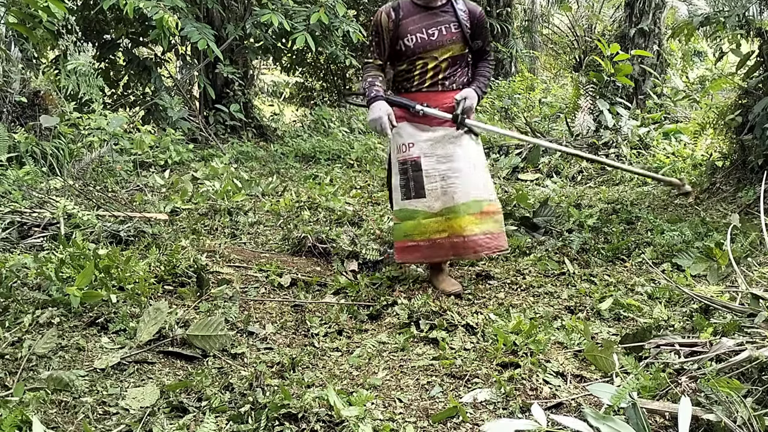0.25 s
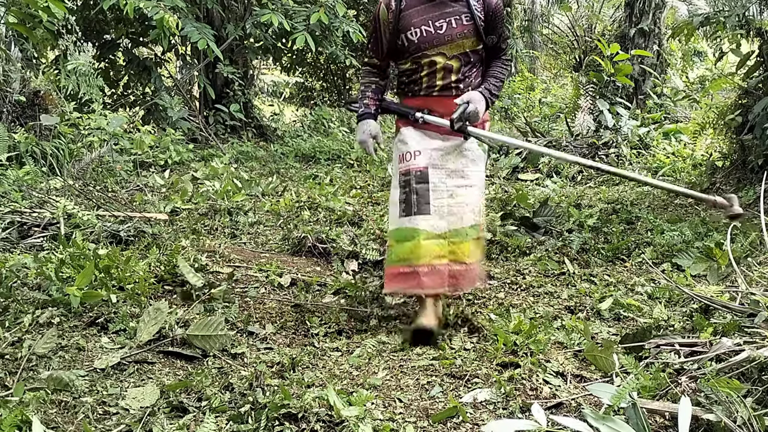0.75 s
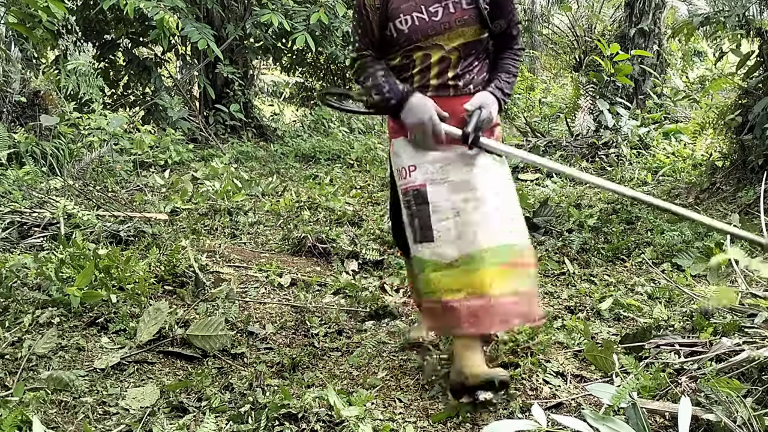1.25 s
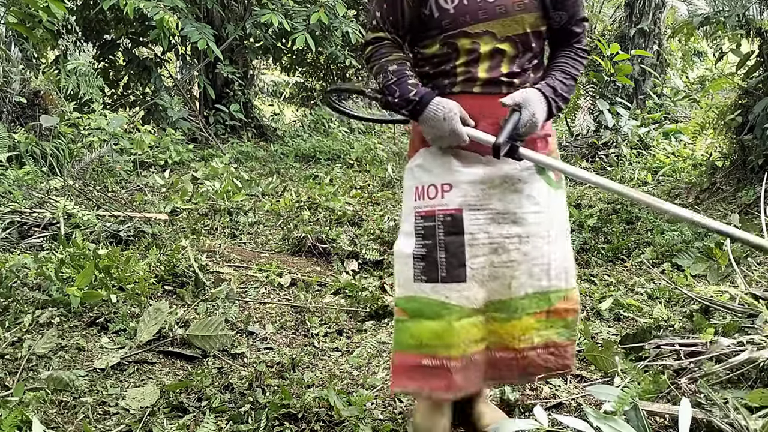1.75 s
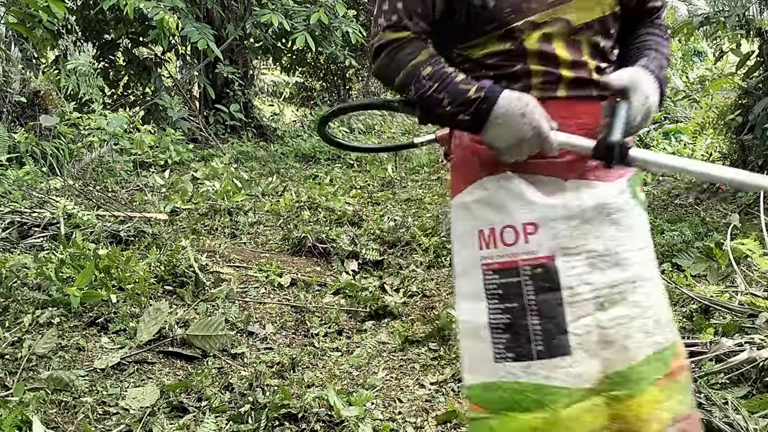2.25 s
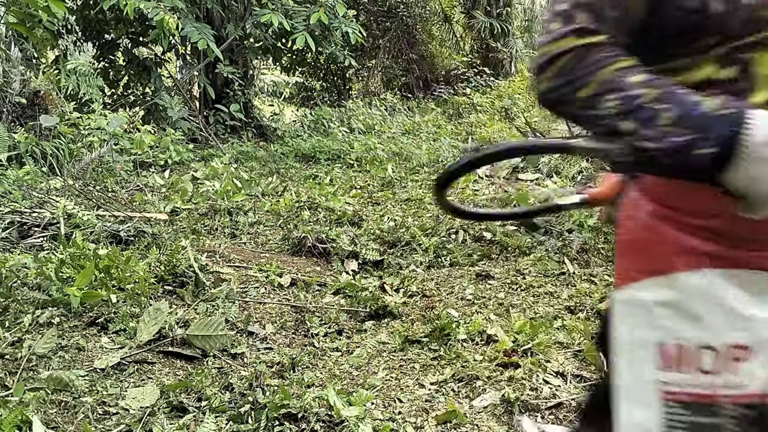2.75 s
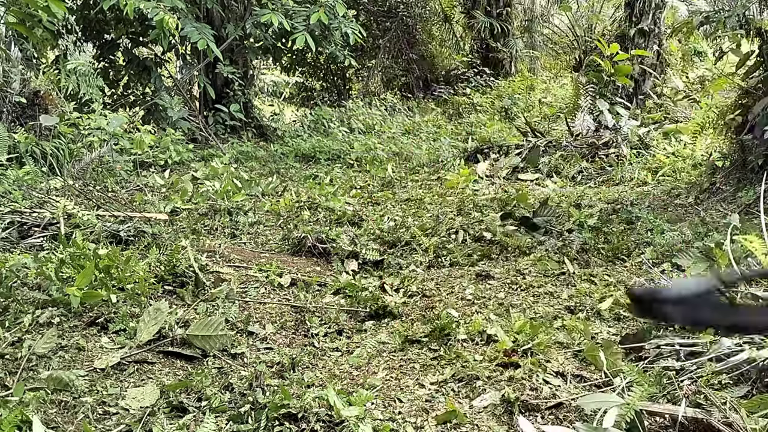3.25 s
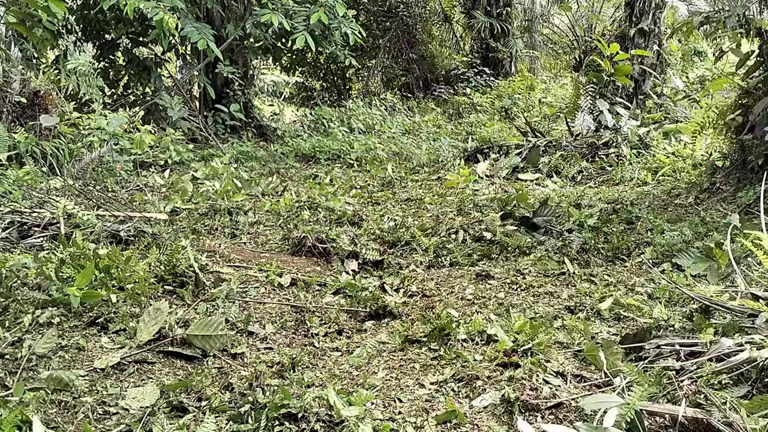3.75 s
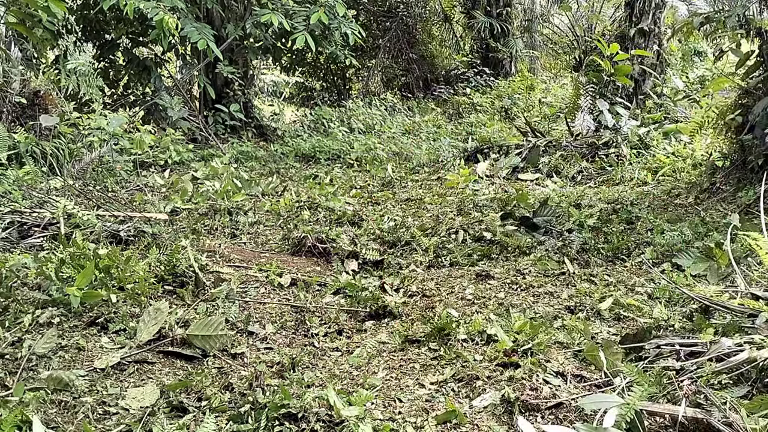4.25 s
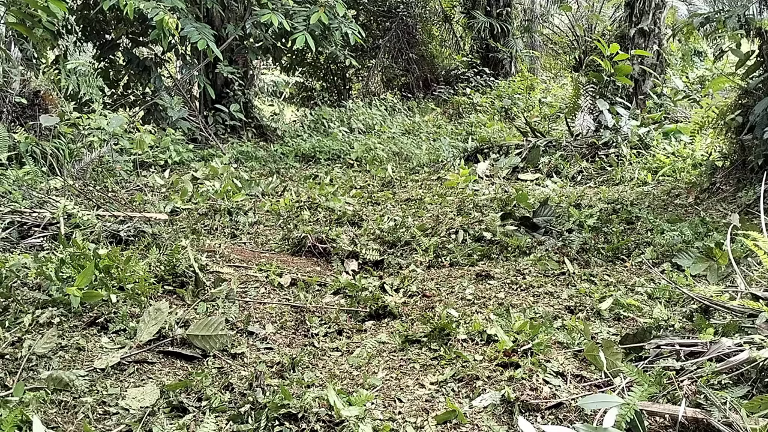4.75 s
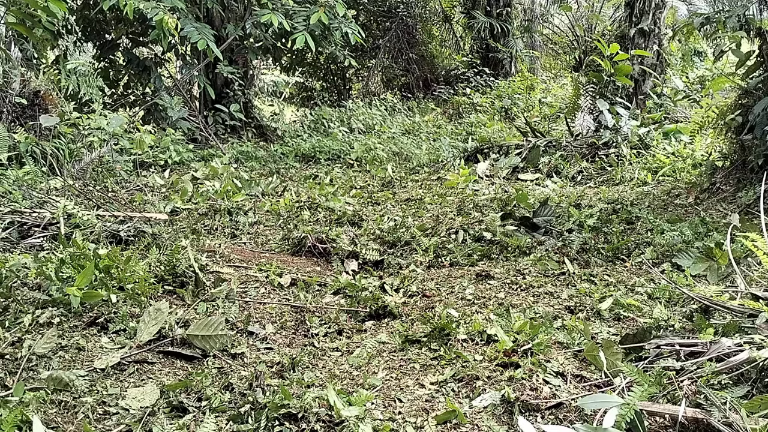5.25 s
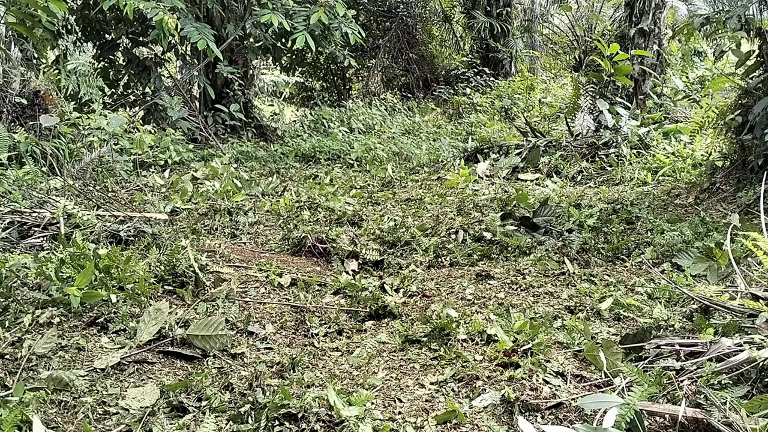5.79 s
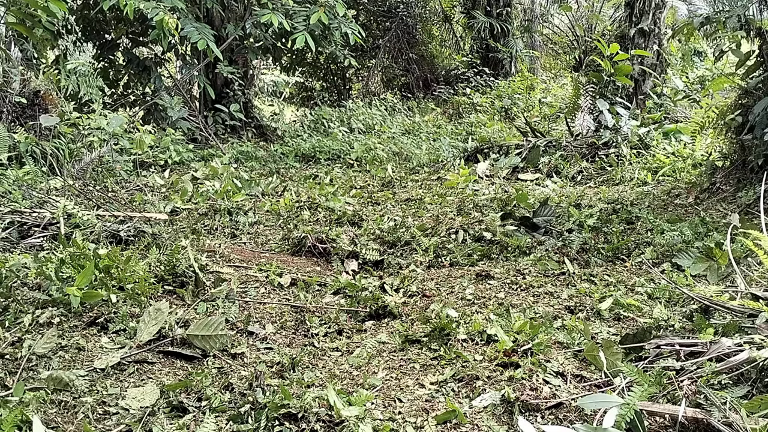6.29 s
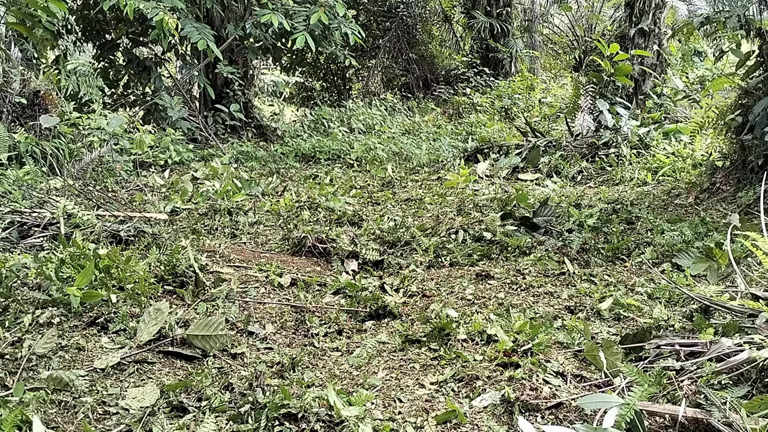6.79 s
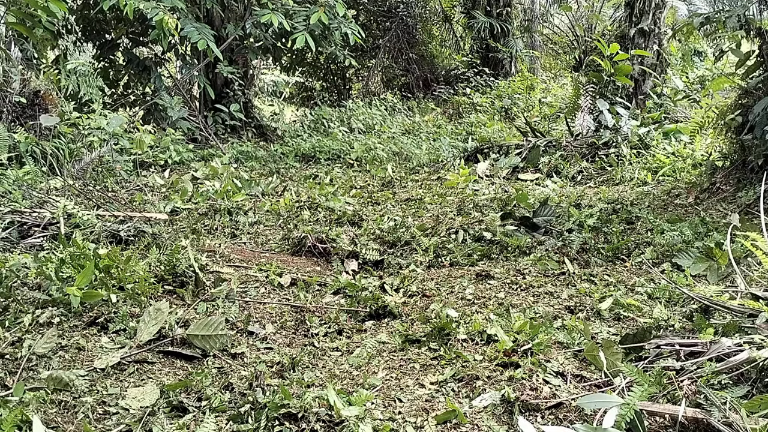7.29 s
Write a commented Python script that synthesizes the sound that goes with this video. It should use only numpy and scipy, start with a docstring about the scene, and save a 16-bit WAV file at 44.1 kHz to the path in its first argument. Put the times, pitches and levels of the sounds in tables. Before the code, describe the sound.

A two-stroke brush cutter idles throughout, carried on a walker's back in an open plantation. From 0 to 1 s it is fairly quiet and muffled: rapid soft puffs, roughly twenty-five a second, with uneven stronger pops every 0.05 to 0.15 s. It gradually nears from 1 to 3 s; a boot crunches dry leaves around 1.45 s, with twig snaps from 1.2 to 1.7 s. As the worker passes, about 3 to 3.5 s, the exhaust swings toward the microphone and the pops become much louder, hollow and crackling, with brief gas hiss, ticks, loose rattles and fine metallic jingle. It peaks around 4 to 5 s, more twigs snapping near 4.4 to 4.6 s. It softens a little around 5.4 to 6.3 s, then strengthens again until the cut-off at 7.5 s, still idling. Faint low rumble lies beneath; close, dry, almost mono sound with a short ground reflection.

```python
"""A two-stroke brush cutter idles on a worker's back as he walks up to the listener and past, in a plantation.
Fired turns pop, with a crack and gas hiss; unfired turns breathe a dull puff. Both ring silencer modes.
Ticks, running noise and a treble jingle come from decaying sines and filtered noise.
A delayed, dulled copy is the ground echo; boots stir dry leaves, twigs snap, a low rumble lies beneath."""
import sys
import numpy as np
from scipy import signal
from scipy.fft import rfft, irfft, next_fast_len
from scipy.io import wavfile
from scipy.ndimage import uniform_filter1d

SR = 44100
rng = np.random.default_rng(int(sys.argv[2]) if len(sys.argv) > 2 else 0)


def unload_wav(signal):
    """Save mono or channel-first audio to the path in sys.argv[1] as 16-bit WAV at rate SR, clipped to [-1, 1]."""
    wavfile.write(
        sys.argv[1],
        SR,
        np.round(np.clip(np.atleast_2d(signal).T, -1, 1) * 32767).astype(np.int16),
    )


N = 332073

# fired turns: t/s, relative pop level/dB, relative crack level/dB
FIRED_TURNS = [(0.0698, -25.5, -44.5), (0.1402, -23.5, -42.5), (0.207, -27, -53), (0.262, -22.5, -37),
               (0.355, -21.5, -35), (0.4444, -24.5, -49), (0.5756, -24, -38), (0.645, -22.5, -42),
               (0.707, -23, -43), (0.775, -24, -46), (0.845, -24, -39), (0.9092, -23.5, -38),
               (1.041, -23.5, -41), (1.1, -22.5, -40), (1.2699, -21, -48), (1.3451, -20.5, -42),
               (1.4083, -17.5, -31.5), (1.511, -19.5, -45), (1.5823, -19, -46), (1.6465, -17.5, -32.5),
               (1.742, -16.5, -35.5), (1.836, -17.5, -47), (1.955, -16, -33), (2.051, -16.5, -36),
               (2.119, -18.5, -57), (2.188, -14.5, -32), (2.262, -14, -34.5), (2.3624, -15.5, -35),
               (2.42, -18, -55), (2.493, -13.5, -29.5), (2.593, -19, -54.5), (2.628, -16, -41),
               (2.6991, -12.5, -29), (2.79, -15.5, -38), (2.8559, -12.5, -32), (2.9144, -13, -39),
               (2.9784, -13.5, -38), (3.0411, -12, -29), (3.1374, -9.5, -28), (3.215, -11, -38),
               (3.2868, -12.5, -39), (3.349, -7, -21.5), (3.4457, -7.5, -27), (3.5399, -7.5, -22.5),
               (3.6248, -11, -44), (3.6944, -10.5, -40), (3.7694, -8, -28.5), (3.834, -11.5, -52),
               (3.898, -6.5, -26.5), (3.9933, -10, -37), (4.0552, -6, -22.5), (4.122, -12.5, -37),
               (4.1575, -5.5, -23.5), (4.313, -4.5, -21), (4.413, -10, -34), (4.473, -8, -33),
               (4.549, -6.5, -24.5), (4.6021, -5.5, -24), (4.705, -6.5, -26.5), (4.7872, -13.5, -52),
               (4.8243, -11, -34), (4.9003, -8, -23.5), (4.9709, -7.5, -26), (5.0652, -6.5, -23.5),
               (5.1864, -11.5, -48), (5.2227, -9.5, -37), (5.2979, -6.5, -25.5), (5.381, -14.5, -33),
               (5.451, -9, -26), (5.549, -13, -56), (5.5794, -13, -55), (5.647, -8.5, -25),
               (5.747, -9, -26.5), (5.837, -12.5, -40.5), (5.899, -10.5, -33), (5.9974, -9.5, -33),
               (6.1294, -11, -36), (6.1845, -10, -34.5), (6.2583, -10, -40), (6.324, -9, -28.5),
               (6.454, -9, -31), (6.528, -9, -34), (6.6009, -11, -61), (6.6673, -7.5, -28.5),
               (6.7676, -6.5, -21.5), (6.858, -12.5, -46.5), (6.8937, -8, -37), (6.9528, -9, -39),
               (7.017, -6.5, -24), (7.113, -8.5, -29.5), (7.2043, -11.5, -42), (7.272, -6.5, -24.5),
               (7.3456, -9, -42), (7.4117, -5.5, -21), (7.513, -8.5, -34)]
# unfired puffs, also the nearness of the engine: t/s, relative level/dB
PUFF_LEVEL = [(0.0, -19), (0.5, -20), (1.0, -18.5), (1.5, -17.5), (2.0, -16.5), (2.5, -16.5), (3.0, -14.5),
              (3.5, -12.5), (4.0, -9.5), (4.5, -7.5), (5.0, -10.5), (5.5, -13.5), (6.0, -15), (6.5, -13),
              (7.0, -10.5), (7.5, -11)]
# walk past: t/s, exhaust facing the listener/0-1, engine side-on/0-1, extra path via the ground/ms
WALK_PAST = [(0, 0.03, 0.01, 0.48), (1, 0.02, 0.14, 0.45), (1.5, 0.01, 0.54, 0.58), (2.5, 0, 0.98, 0.77),
             (3, 0.21, 1, 0.95), (3.5, 0.72, 0.93, 1.21), (4, 0.84, 0, 1.35), (4.8, 0.85, 0.08, 1.37),
             (5.5, 0.69, 0.97, 1.17), (6, 0.35, 1, 0.91), (6.5, 0.71, 0.84, 1.06), (7, 0.73, 0.5, 1.36),
             (7.53, 0.84, 0.63, 1.29)]
POP_AWAY_DB = 5.5  # a pop is this much softer with the exhaust turned away


def charges_db():
    """Charge: pop level over puff level, corrected for exhaust aim."""
    fire_s, pop_db, _ = np.transpose(FIRED_TURNS)
    return pop_db - puff_level_db(fire_s) + POP_AWAY_DB * (1 - exhaust_facing(fire_s))


def puff_level_db(s):
    """Puff level at given times; it follows the walk."""
    return np.interp(s, *np.transpose(PUFF_LEVEL))


def exhaust_facing(s):
    """Share of the exhaust that points at the listener, 0-1."""
    return np.interp(s, *np.transpose(WALK_PAST)[:2])


# half burns, dull puffs that come early and reset the beat: t/s
HALF_BURN_S = [0.006, 0.4207, 0.506, 0.978, 1.006, 1.1673, 1.234, 1.923, 2.757, 3.1574, 3.8601, 4.0191,
               4.2441, 4.435, 4.573, 4.7564, 5.1498, 5.511, 5.804, 6.095, 6.155, 6.4141, 7.1681, 7.479]
# idle speed: t/s, length of a turn before slowing and kick/ms
IDLE_TURN = [(0, 35.5), (0.8, 38), (1.2, 36), (1.8, 33.5), (2.5, 39), (3, 37.5), (4, 36), (5.4, 37.5),
             (6.1, 40), (6.7, 37.5), (7.53, 37.5)]
KICK_MS_PER_DB = 0.67  # a bigger charge shortens the next turns
SLOWING = 1.035  # length ratio of successive coasting turns
SHORTEST_S = .016  # least gap before the next burn


def coasting():
    """Times of unfired turns: after each burn the crank coasts on, ever slower."""
    fire_s = np.transpose(FIRED_TURNS)[0]
    burn_s = np.r_[fire_s, HALF_BURN_S]
    charge_db = np.r_[charges_db(), np.zeros(len(HALF_BURN_S))]
    turn_ms = np.interp(burn_s, *np.transpose(IDLE_TURN)) - KICK_MS_PER_DB * charge_db
    coast = np.cumsum(SLOWING ** np.arange(4))
    turn_s = burn_s[:, None] + turn_ms[:, None] / 1000 * coast
    ahead_s = np.r_[np.sort(burn_s), N / SR]
    next_burn_s = ahead_s[np.searchsorted(ahead_s, burn_s, "right")]
    free = turn_s < next_burn_s[:, None] - SHORTEST_S
    return np.sort(np.r_[HALF_BURN_S, turn_s[free]])


# a bigger charge rises more slowly and rings the upper modes harder
SLOWER_PER_DB, BRIGHTER_DB_PER_DB, BRIGHT_FROM_HZ = 0.0139, 0.4, 560


def silencer(s, db, modes, heat, scatter_db, charge_db, choke_ms, left_ringing):
    """Each blow-down rings decaying modes, choked to a share as the port shuts."""
    walked_s, _, side_on, _ = np.transpose(WALK_PAST)
    facing, side_on = exhaust_facing(s), np.interp(s, walked_s, side_on)
    since = np.arange(2200) / SR
    shut = left_ringing + (1 - left_ringing) / (1 + np.exp(1000 * since - choke_ms))
    chance = rng.standard_normal((len(s), len(modes)))
    out = 0
    for mode, c in zip(modes, chance.T):
        hz, t60, rise_ms, after_ms, away_db, side_db, facing_db, share = mode
        t = np.maximum(since - after_ms / 1000, 0)
        not_facing = side_on * undb(side_db) + (1 - side_on) * undb(away_db)
        aim = facing * undb(facing_db) + (1 - facing) * not_facing
        octaves_up = np.log2(max(hz / BRIGHT_FROM_HZ, 1))
        size = aim * undb(db + scatter_db * c + BRIGHTER_DB_PER_DB * charge_db * octaves_up)
        rise_ms = rise_ms * np.exp(SLOWER_PER_DB * charge_db)[:, None]
        ring = np.sin(2 * np.pi * hz * (1 + share * heat[:, None]) * t)
        out = out + size[:, None] * ring * (1 - np.exp(-1000 * t / rise_ms)) * undb(-60 * t / t60)
    return place(s, out * shut)


# silencer modes, fired: f/Hz before heat, t60/s, rise before charge/ms, delay/ms,
# gain from behind/dB, gain side-on/dB, gain facing the exhaust/dB, share of pitch that follows heat
FIRED_MODES = [(162.3, 0.24, 7, 5.995, 13.5, 6.5, -1, 0.28), (79, 0.0098, 1.57, 8.32, 20, 18.5, -4, 0.05),
               (232.6, 0.2, 0.06, 2.07, 2, -7.5, -1, 0.4), (313.8, 0.038, 8.4, 0.38, -3, -22, 11.5, 0.24),
               (448, 0.033, 0.52, 3.42, -19, 2, -5.5, 0.026),
               (113.7, 0.14, 0.15, 7.44, -3.5, -6.5, -5.5, 0.067),
               (513, 0.017, 1.5, 2.61, -9.5, -2.5, -2, 0.065),
               (662.5, 0.014, 1.3, 2.646, 0.5, -4, -5, 0.046),
               (991, 0.025, 2.4, 2.24, -25, -15.5, -16, 0.1)]


def pops():
    """Fired blow-downs; a bigger charge leaves hotter gas, which rings higher."""
    fire_s, pop_db, _ = np.transpose(FIRED_TURNS)
    heat = 0.022 * (pop_db - puff_level_db(fire_s))
    return silencer(fire_s - .002, pop_db, FIRED_MODES, heat, 0.81, charges_db() - 2.5,
                    choke_ms=17.3, left_ringing=0.15)


# silencer modes, unfired: f/Hz before heat, t60/s, rise/ms, delay/ms,
# gain from behind/dB, gain side-on/dB, gain facing the exhaust/dB, share of pitch that follows heat
UNFIRED_MODES = [(131.4, 0.046, 8.9, 1.38, 17.5, 18, 15.5, 0.93),
                 (189.2, 0.093, 0.26, 5.28, -29, -11, 1.5, 1.2),
                 (164.3, 0.095, 7.6, 0.87, -5, -28, 7.5, 1.0), (427, 0.054, 8.3, 1.4, -19.5, 1, -12, 0.23),
                 (686, 0.052, 2.5, 2.51, -25, -16, -24.5, 1.9),
                 (114.7, 0.2, 3.15, 4.22, -0.5, 0, -7.5, 0.28)]
SUCK_MS, SUCK_DB = 3.1, -10  # level relative to the puff


def puffs(cold_s):
    """Unfired cylinders suck for a moment, then puff through the silencer."""
    chance = rng.standard_normal((len(cold_s), 2)).T
    level_db = puff_level_db(cold_s)
    puff = silencer(cold_s - .0012, level_db + .5 * chance[0], UNFIRED_MODES, .015 * chance[1], .6,
                    0 * cold_s, choke_ms=16.7, left_ringing=0.6)
    dip = np.hanning(int(SUCK_MS * SR / 1000))
    return puff - place(cold_s - .0024, undb(level_db + SUCK_DB)[:, None] * dip)


# casing resonances: f/Hz, basic width/Hz, relative level/dB
CASING_PARTS = [(2115, 110, 0.5), (2790, 97, -4.5), (4240, 650, -0.5), (7760, 140, -10.5),
                (10050, 1000, -1), (12100, 160, -8.5), (13600, 170, -3)]
CRACK_RISE_MS, CASING_T60_S = 2.06, 0.071


def cracks():
    """Firings shake the casing parts in varying shares, plus a broad burst."""
    fire_s, _, crack_db = np.transpose(FIRED_TURNS)
    out = 0
    for hz, width_hz, db in CASING_PARTS:
        share_db = crack_db + db - 10.5 + 2.7 * rng.standard_normal(len(fire_s))
        part = noise([(1, -99), (2, -99)], [(hz, width_hz + 400, 0)])  # resonance alone
        out = out + fading(fire_s + .001, share_db, CASING_T60_S, CRACK_RISE_MS) * part
    broad = noise([(1000, 12.5), (5000, -4.0), (7000, -7.5), (16000, 8.0)])
    return out + fading(fire_s + 0.0013, crack_db + 2.5, 0.054, CRACK_RISE_MS) * broad


# gas spectrum: f/Hz, relative level/dB
GAS_TONE = [(300, 15.5), (700, 10.5), (1500, -3), (3000, -35), (6000, -19), (10000, -45), (16000, -14)]


def gas():
    """Escaping gas: a short noise burst with each pop."""
    fire_s, pop_db, _ = np.transpose(FIRED_TURNS)
    return fading(fire_s + 0.00115, pop_db - 16.0, 0.047, 0.61) * noise(GAS_TONE)


PORT_SHUTS_S = .0175


def ticks(turn_s, luck):
    """Port, intake, piston skirt and loose parts: short decaying sines."""
    near_db = puff_level_db(turn_s) - 9 * (1 - exhaust_facing(turn_s))
    port_hz, intake_hz = 1150 + 150 * luck[2], 900 + 150 * luck[2]
    out = clicks(turn_s + PORT_SHUTS_S + 0.00045 * luck[0], near_db - 6.0 + 1.55 * luck[1], port_hz, 0.006)
    # intake gulp
    gulp_db = near_db - 8.0 + 12.0 * np.tanh(luck[4])
    out += clicks(turn_s + 0.028 + 0.001046 * luck[3], gulp_db, intake_hz, 0.0042)
    # skirt knocks on the casing
    knock_db = near_db - 24.0 + 8.1 * np.tanh(luck[6])
    knock_hz = CASING_PARTS[1][0] + 90 * luck[7]
    out += clicks(turn_s + 0.0034 + 0.000703 * luck[5], knock_db, knock_hz, 0.021)
    knock_db = near_db - 23.5 + 14.0 * np.tanh(luck[9])
    knock_hz = CASING_PARTS[2][0] + 450 * luck[7]
    out += clicks(turn_s + 0.0033 + 0.004 * luck[8], knock_db, knock_hz, 0.004)
    # loose parts rattle at any moment of the turn
    when, strength, pitch = rng.random((900, 3)).T
    at_s = when * (N / SR - .01)
    rattle_db = puff_level_db(at_s) - 33.5 + 13 * strength ** 2 - 9 * pitch
    return out + clicks(at_s, rattle_db, 1100 * 5.18 ** pitch, 0.025)


TICK_RISE_MS = 0.2


def clicks(s, db, hz, t60):
    """Short ticks that start downward, each at its own pitch."""
    t = np.arange(900) / SR
    ring = np.sin(2 * np.pi * hz[:, None] * t)
    return place(s, -undb(db)[:, None] * ring * (1 - np.exp(-1000 * t / TICK_RISE_MS)) * undb(-60 * t / t60))


# running noise spectrum: f/Hz, relative level/dB
WHIRR_SPECTRUM = [(100, 4.5), (330, 0.5), (440, 0.5), (700, -1.5), (1500, -15), (2200, -15), (4200, -27.5),
                  (7000, -43), (9000, -43)]
WHIRR_SWELL, WHIRR_DB = 1.225, -23.5  # dB per dB of puff level, base level with puffs at 0 dB


def whirr(turn_s, luck):
    """Running noise through casing resonances; it breathes with each turn."""
    (puff_db,) = curve(PUFF_LEVEL)
    breath = 1 + fading(turn_s, 3.55 + 1.4 * luck[1], 0.096, 10.8)
    parts = [(1520, 110, 10)] + CASING_PARTS[:3]
    peaks = [(hz, width_hz, db - 22.0) for hz, width_hz, db in parts]
    level = undb(WHIRR_DB + WHIRR_SWELL * puff_db + 3.4 * wander(60))
    return level * breath * noise(WHIRR_SPECTRUM, peaks)


# jingle bands: nominal f/Hz, relative level/dB
JINGLE_BANDS = [(5500, -64), (7000, -9.5), (8800, -16.5), (10500, -8), (12500, -23), (14600, 4)]
JINGLE_SWELL, JINGLE_DB = 0.82, -49  # dB per dB of puff level, base level with puffs at 0 dB


def jingle(turn_s, luck):
    """Treble noise bands flicker, partly together; strokes and port closings shake them."""
    (puff_db,) = curve(PUFF_LEVEL)
    together_db = 2.0 * wander(50)
    shake = 1 + fading(turn_s + 0.0021, 5.0 + 5.4 * luck[4], 0.026, 1.1)
    shake += fading(turn_s + PORT_SHUTS_S, 3.5 + 5.0 * luck[6], 0.042, 1.3)
    out = 0
    for hz, db in JINGLE_BANDS:
        level = undb(JINGLE_DB + JINGLE_SWELL * puff_db + db + together_db + 5.5 * wander(45))
        band = noise([(0.58 * hz, -40), (1.18 * hz, 0), (1.09 * hz, 0), (1.058 * hz, -40)])
        out = out + level * shake * band
    return out


def engine():
    """Engine body and treble jingle, tied to the same crank turns."""
    cold_s = coasting()
    turn_s = np.r_[cold_s, np.transpose(FIRED_TURNS)[0]]
    luck = rng.standard_normal((len(turn_s), 10)).T  # ten draws a turn, shared by the layers
    body = pops() + puffs(cold_s) + ticks(turn_s, luck) + cracks() + gas() + whirr(turn_s, luck)
    return body, jingle(turn_s, luck)


GROUND_DB = -5.5


def ground(x):
    """Adds a later copy off the soil, which swallows the treble."""
    late_ms = curve(WALK_PAST)[-1]
    late = np.interp(np.arange(N) - late_ms * SR / 1000, np.arange(N), x)
    return x + undb(GROUND_DB) * colour(late, [(450, -1.5), (900, -4.0), (4000, -55)])


# leaf spectrum: f/Hz, relative level/dB
LEAF_SPECTRUM = [(400, -7), (1200, -6), (3000, -2), (6000, -4.5), (11000, 1), (16000, 3.5)]
# twigs: t/s, relative level/dB, centre f/Hz
TWIG_SNAPS = [(1.206, -19.5, 11200), (1.324, -28, 11200), (1.374, -25, 10800), (1.557, -24, 3950),
              (1.561, -13.5, 3770), (1.567, -27, 4000), (1.704, -19.5, 4700), (1.955, -35, 2770),
              (4.3784, -23.5, 5620), (4.436, -17, 2700), (4.5551, -11, 3860), (4.563, -20, 3600),
              (4.5874, -18, 4230)]


def leaves():
    """Boots rustle filtered noise; twigs snap as short noise around a pitch."""
    swish = rustle() * noise(LEAF_SPECTRUM)
    s, db, hz = np.transpose(TWIG_SNAPS)
    t = np.arange(600) / SR
    grit = uniform_filter1d(rng.standard_normal((len(s), len(t))), size=8)
    ring = grit * np.sin(2 * np.pi * hz[:, None] * t)
    envelope = np.minimum(t / 0.00057, 1) * undb(-60 * t / 0.014)
    return swish + place(s, undb(db + 2.5)[:, None] * ring * envelope)


# boots in dry leaves: start t/s, hold/s, level/dB
BOOT_STEPS = [(0.363, 0.17, -47), (0.997, 0.16, -50), (1.438, 0.071, -24.5), (1.55, 0.009, -37),
              (1.644, 0.011, -54), (2.42, 0.12, -47.5), (3.5, 0.078, -48), (4.404, 0.14, -44)]
STEP_ATTACK_DB_PER_S, STEP_RELEASE_DB_PER_S = 700, 254


def rustle():
    """Level of the leaves: each step swells fast, holds and dies away."""
    t = np.arange(N) / SR
    out = 0
    for s, hold_s, db in BOOT_STEPS:
        attack_db = STEP_ATTACK_DB_PER_S * np.maximum(s - t, 0)
        release_db = STEP_RELEASE_DB_PER_S * np.maximum(t - s - hold_s, 0)
        out = out + undb(db - attack_db - release_db)
    return out


RUMBLE_DB = -32.5


def rumble():
    """Steady low noise, strongest near 30 Hz."""
    return undb(RUMBLE_DB) * noise([(15, -18), (30, 11.5), (60, -8.5), (120, -43.5)])


def undb(db):
    """dB to amplitude."""
    return 10 ** (np.asarray(db) / 20)


def curve(table):
    """Columns of a table, one value a sample."""
    s, *columns = np.transpose(table)
    return [np.interp(np.arange(N) / SR, s, c) for c in columns]


def colour(x, points, peaks=()):
    """Filter by (Hz, dB) points, with (Hz, width Hz, dB) resonances on top."""
    size = next_fast_len(N)
    hz = np.maximum(np.fft.rfftfreq(size, 1 / SR), 1)
    point_hz, point_db = np.array(points).T
    gain = undb(np.interp(np.log(hz), np.log(point_hz), point_db))
    for f, width_hz, db in peaks:
        gain = gain + undb(db) / (1 + (2 * (hz - f) / width_hz) ** 2)
    return irfft(rfft(x, size) * gain, size)[..., :N]


def noise(points, peaks=()):
    """Coloured noise of rms 1."""
    x = colour(rng.standard_normal(N), points, peaks)
    return x / x.std()


def place(s, shapes):
    """Sum of short shapes that start at the given times."""
    at = (s * SR).astype(int)[:, None] + np.arange(shapes.shape[1])
    return np.bincount(at.ravel(), shapes.ravel(), N + 2 * SR)[:N]


def fading(s, db, t60, rise_ms):
    """Envelope of bursts with a quick rise and a fading tail."""
    t = np.arange(3000) / SR
    return place(s, undb(db)[:, None] * (1 - np.exp(-1000 * t / rise_ms)) * undb(-60 * t / t60))


def wander(rate_hz):
    """Random levels held 1 / rate_hz and slewed; spread near 1."""
    k = int(SR / rate_hz)
    held = np.repeat(rng.standard_normal(N // k + 1), k)
    return 1.1 * uniform_filter1d(held, k)[:N]


SIDE_DB = -27


def scene():
    """Everything near the middle; a filtered copy makes the two channels differ a little."""
    body, treble = engine()
    mid = ground(body) + treble + leaves() + rumble()
    side_tone = [(50, -1), (150, -3.0), (350, -9.0), (700, 8.0), (1400, -8.0),
                 (2400, -20), (4400, -10.5), (9000, -8), (15000, 1)]
    side = undb(SIDE_DB) * colour(mid, side_tone)
    return np.array([mid - side, mid + side])


# microphone response: f/Hz, gain/dB
MIC_RESPONSE = [(12, -45), (30, -21.5), (70, -10.5), (100, -1.5), (300, -0.5), (600, 0.5), (6000, -1),
                (7600, -4), (8400, -8), (9300, 1), (10500, 3.5), (14000, -3), (15700, -10)]
TOP_HZ = 16000


def record(dry):
    """Microphone bass cut, port resonance and a steep top cut."""
    top_cut = signal.ellip(10, .2, 80, TOP_HZ, fs=SR, output="sos")
    return signal.sosfilt(top_cut, colour(dry, MIC_RESPONSE))


dry = scene()
out = record(dry)
unload_wav(out)
```